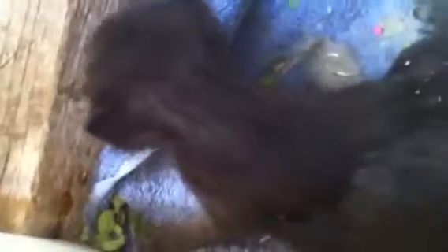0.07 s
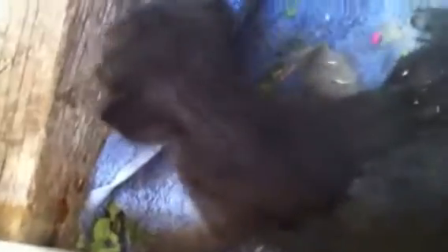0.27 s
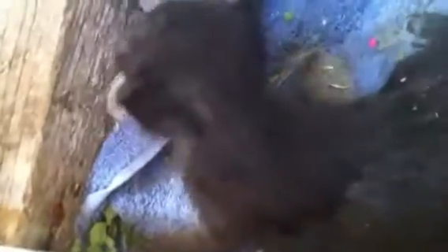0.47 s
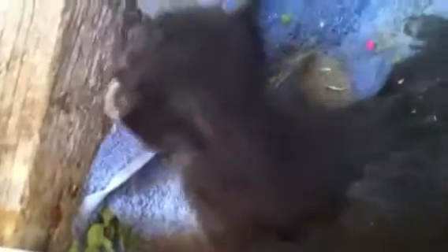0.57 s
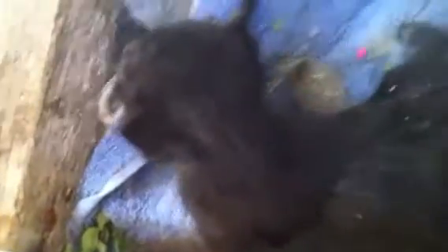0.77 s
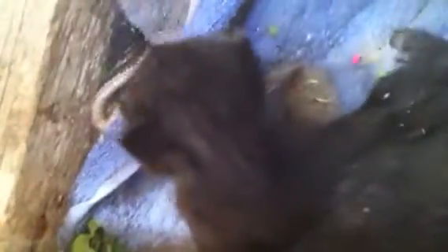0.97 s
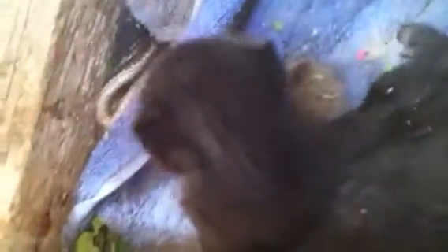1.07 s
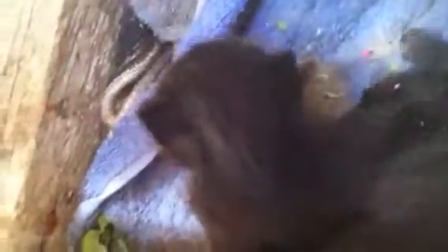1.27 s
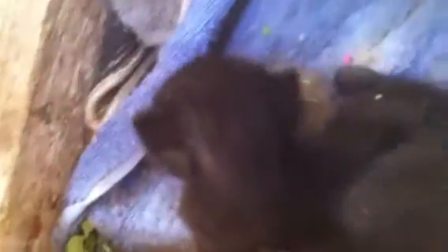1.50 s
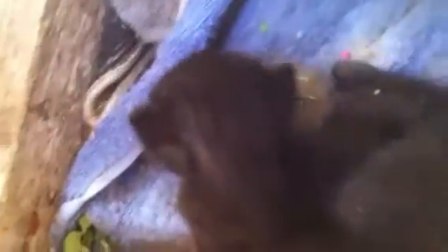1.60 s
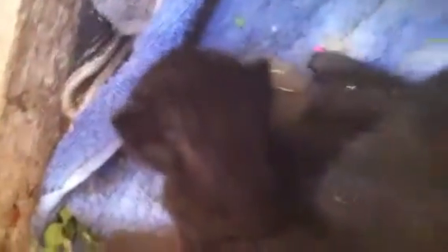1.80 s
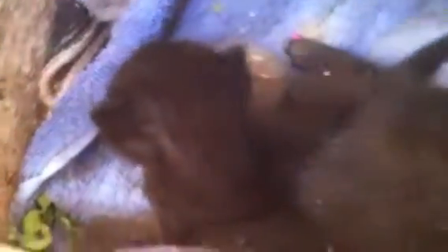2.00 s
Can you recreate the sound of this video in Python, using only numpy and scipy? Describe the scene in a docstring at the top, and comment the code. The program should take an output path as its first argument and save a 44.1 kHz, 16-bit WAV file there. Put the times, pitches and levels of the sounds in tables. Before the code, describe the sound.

Kitten mews, close: a rough thin cry rises from 0 s, breaks higher near 0.2 and sinks, fading by about 0.75. A muffled scuff and cluster of paw bumps hits at 0.35-0.4, softer bumps continuing to 0.85, with a faint distant mew near 0.55. A second, wavering mew runs 0.87-1.25, ending in a rough catch. Then quiet fur rustle, light bumps from 1.73, faint outdoor hush.

```python
"""First a kitten's rough, thin cry slides up, breaks into a higher register and sinks away in a mew.
The place is a blanket-lined wooden box, kittens and cloth close to the microphone, one kitten farther off.
A second mew wavers and ends in a rough catch; the voices are a fundamental with throat-shaped overtones.
Paws bump a floor of damped modes; claws snag and tick; cloth and fur are streams of random slips.
Behind it all lies a faint outdoor hush of coloured noise."""
import sys
import numpy as np
from scipy import signal
from scipy.fft import rfft, irfft
from scipy.io import wavfile

SR = 44100
rng = np.random.default_rng(int(sys.argv[2]) if len(sys.argv) > 2 else 0)


def bounce(signal):
    """Save signal as a 16-bit WAV file at the path given by the first command-line argument."""
    frames = np.transpose(np.atleast_2d(signal))
    limited = np.clip(frames, -1, 1)
    pcm = np.round(limited * 32767).astype(np.int16)
    wavfile.write(sys.argv[1], SR, pcm)


N = 90404
TIME = np.arange(N) / SR
CUTOFF_HZ = 15700


def from_db(db):
    """Decibels to gain."""
    return 10 ** (np.asarray(db) / 20)


def rms_one(x):
    """Scale to unit rms."""
    return x / np.sqrt(np.mean(x ** 2) + 1e-20)


def at_hz(points, hz):
    """Read a spectrum on a log-frequency axis."""
    f, db = np.transpose(points)
    return np.interp(np.log(hz + 1e-9), np.log(f), db)


def level(rows):
    """Gain from a dB curve, its end values held 30 ms longer, then silent."""
    s, db = np.transpose(rows)
    sounding = (TIME >= s[0] - .03) * (TIME <= s[-1] + .03)
    return from_db(np.interp(TIME, s, db)) * sounding


def curve(rows):
    """Read a dB curve over time."""
    return np.interp(TIME, *np.transpose(rows))


def drift(hz):
    """Smooth random motion of spread 1: noise through a double pole, its settling half dropped."""
    r = np.exp(-2 * np.pi * hz / SR)
    motion = signal.lfilter([1], [1, -2 * r, r * r], rng.standard_normal(2 * N))
    return rms_one(motion[N:])


def coloured(x, colour):
    """Give an excitation a spectrum; rms 1."""
    hz = np.arange(N + 1) * SR / (2 * N)
    spectrum = rfft(x, 2 * N) * from_db(at_hz(colour, hz))
    return rms_one(irfft(spectrum)[:N])


def grains(per_s, spread_db):
    """Random slips of uneven size and either sign."""
    size_db = spread_db * np.minimum(rng.exponential(1, N), 4)
    sizes = from_db(size_db) * rng.choice([-1, 1], N)
    return sizes * (rng.random(N) < per_s / SR)


def low_pass(x, hz):
    """Second-order low-pass."""
    return signal.sosfilt(signal.butter(2, min(hz, SR / 2 - 1), fs=SR, output="sos"), x + 1e-18)


# spectrum of the outdoor air behind the box: (f/Hz, level/dB)
HUSH_COLOUR = [(30, -33), (70, -20), (170, 1), (450, -2), (950, -4.5), (1600, -7), (4300, -29.5),
               (5500, -23.5), (9000, -29.5), (12000, -32.5), (15500, -42)]


def hush():
    """Outdoor background: steady noise with a sloping spectrum, at -58 dB rms."""
    return from_db(-58) * coloured(rng.standard_normal(N), HUSH_COLOUR)


SLIP_SPREAD_DB = 1.5

# dull shuffling on the blanket: (t/s, level/dB)
SHUFFLE = [(0, -65), (.14, -48), (.29, -55.5), (.34, -33), (.42, -34.5), (.52, -44.5), (.6, -44),
           (.84, -40.5), (.88, -54), (.98, -56.5), (1.02, -44.5), (1.09, -56), (1.26, -52), (1.34, -58.5),
           (1.69, -62), (1.73, -43.5), (2.05, -48.5)]
# its spectrum: (f/Hz, level/dB)
SHUFFLE_COLOUR = [(30, -38), (60, -19), (110, -2), (185, -0.5), (310, -8), (450, -28.5), (900, -34.5),
                  (6000, -100)]


def shuffle():
    """Dense slips of cloth on the padded floor, heard as a low rumble between the bumps."""
    return level(SHUFFLE) * coloured(grains(per_s=900, spread_db=SLIP_SPREAD_DB), SHUFFLE_COLOUR)


# one hard scuff: (t/s, level/dB)
SCUFF = [(.338, -49), (.358, -29.5), (.372, -24.5), (.385, -30), (.42, -50)]
# its spectrum: (f/Hz, level/dB)
SCUFF_COLOUR = [(40, -42), (125, -9), (200, -6.5), (360, 4.5), (520, -2.5), (780, -8.5), (1200, -18.5),
                (1600, -37), (6000, -72)]


def scuff():
    """A denser stream of slips in one short swell."""
    return level(SCUFF) * coloured(grains(per_s=1600, spread_db=SLIP_SPREAD_DB), SCUFF_COLOUR)


# fur rubbing on the blanket, before its flutter: (t/s, level/dB)
RUSTLE = [(0, -54), (.36, -60.5), (.55, -63), (.62, -60), (.75, -58.5), (.85, -61.5), (1.1, -62.5),
          (1.25, -67), (1.35, -57), (1.48, -59.5), (1.56, -53.5), (1.63, -63), (1.69, -57.5), (1.75, -52.5),
          (1.83, -56), (1.88, -62), (2.05, -58.5)]
# its spectrum: (f/Hz, level/dB)
RUSTLE_COLOUR = [(300, -19), (600, 3), (1200, -4.5), (2000, 3), (3200, 2), (4300, 2), (5200, -7),
                 (8500, -9), (12000, -22.5), (15500, -42)]


def rustle():
    """Fur against cloth: very dense slips of uneven size, with a level that flutters by about 1 dB."""
    rubbing = coloured(grains(per_s=8100, spread_db=2.5), RUSTLE_COLOUR)
    flutter_db = 1.0 * drift(19)
    return level(RUSTLE) * rubbing * from_db(flutter_db)


# a brighter swish of cloth: (t/s, level/dB)
SWISH = [(.64, -96), (.72, -59.5), (.755, -61), (.772, -52.5), (.79, -63), (.84, -90)]
# its spectrum: (f/Hz, level/dB)
SWISH_COLOUR = [(2000, -3), (5000, 2.5), (6400, 9.5), (8000, -2.5), (11500, -5.5), (15000, -27)]


def swish():
    """Cloth slips of nearly even size, bright and brief."""
    return level(SWISH) * coloured(grains(per_s=5900, spread_db=0.5), SWISH_COLOUR)


# claws catching and small wet ticks; level is the steady rms of the resonance that the burst excites,
# width is for one of its two equal stages: (t/s, level/dB, centre f/Hz, width f/Hz, decay to 1/e t/s)
TICKS = [(0.073, -47.5, 9500, 1500, 0.0023), (.469, -57.5, 3470, 5950, .004),
         (.907, -55, 5440, 1400, 0.0045), (1.256, -56.5, 5100, 9000, .014), (1.3, -46, 634, 404, .009),
         (1.952, -58.5, 7000, 6000, .0046)]


def ticks():
    """Brief bursts of noise in one broad, steep-sided resonance each."""
    out = np.zeros(N)
    for s, db, hz, width_hz, decay_s in TICKS:
        r = np.exp(-np.pi * width_hz / SR)
        resonance = [1, 0, -1, 1, -2 * r * np.cos(2 * np.pi * hz / SR), r * r]
        noise = rng.standard_normal(N)
        burst = noise * (TIME >= s) * np.exp(-np.maximum(TIME - s, 0) / decay_s)
        steady, tick = signal.sosfilt([resonance] * 2, [noise, burst + 1e-18 * noise])
        out += from_db(db) * tick / steady.std()
    return out


# claws snag in the weave and let go, jolt level before softening: (t/s, level/dB)
SNAGS = [(0.3588, -26.5), (.3632, -22.5), (0.3728, -24), (0.3768, -23), (0.3801, -23), (0.4013, -22.5),
         (1.3014, -42.5)]
# ringing of the box: (f/Hz, level/dB, 60 dB decay t/s)
SNAG_MODES = [(375, -4, 0.023), (693, -5, 0.013), (1190, -23, .005)]
SNAG_SOFTNESS_HZ = 1610


def snags():
    """A claw lets go of the weave: a brief jolt that rings in the box, softened twice."""
    jolts = np.zeros(N)
    for s, db in SNAGS:
        jolts[int(s * SR)] = -from_db(db)
    ring = np.zeros(N)
    for hz, db, t60 in SNAG_MODES:
        ring += from_db(db - 60 * TIME / t60) * np.cos(2 * np.pi * hz * TIME)
    ringing = signal.fftconvolve(jolts, ring)[:N]
    return low_pass(low_pass(ringing, SNAG_SOFTNESS_HZ), SNAG_SOFTNESS_HZ)


# paws and bodies on the padded floor, level before the filters: (t/s, level/dB, contact brightness f/Hz)
BUMPS = [(.131, -29, 396), (.32, -34, 497), (.345, -10, 705), (0.35, -13.5, 550), (0.3648, -25, 800),
         (0.3819, -15.5, 607), (0.3871, -17.5, 560), (.392, -21, 560), (.398, -15, 700),
         (0.4524, -19.5, 475), (.4725, -24, 398), (.503, -25.5, 484), (0.56, -22.5, 288), (.622, -24, 446),
         (0.629, -19, 530), (0.678, -26.5, 600), (0.7238, -23.5, 455), (.7515, -23, 394),
         (0.815, -22.5, 560), (0.8473, -22.5, 417), (1.014, -35, 520), (1.219, -35.5, 385),
         (1.7326, -21, 424), (1.755, -26.5, 394), (1.912, -32.5, 394), (1.931, -27, 398),
         (1.976, -26.5, 396), (2.041, -29.5, 600)]
# swings of the floor, pitch before detuning: (f/Hz, level/dB, 60 dB decay t/s)
FLOOR_MODES = [(114, -19, 0.12), (187.3, -1, 0.028), (311, -12, 0.013)]
BUMP_RISE_S, FLOOR_DETUNE = 0.00067, .04   # detune is a relative spread, new for each bump and mode
BUMP_LOW_CUT_HZ, PAD_SOFTNESS_HZ = 103, 880


def bumps():
    """Each soft contact sets the damped floor swinging for a few cycles."""
    out = np.zeros(N)
    for s, db, contact_hz in BUMPS:
        age = np.maximum(TIME - s, 0)
        swing = np.zeros(N)
        for hz, mode_db, t60 in FLOOR_MODES:
            mode_hz = hz * rng.normal(1, FLOOR_DETUNE)
            swing += from_db(mode_db - 60 * age / t60) * np.sin(2 * np.pi * mode_hz * age)
        contact = low_pass(swing * (1 - np.exp(-age / BUMP_RISE_S)), contact_hz)
        out += from_db(db) * low_pass(contact, PAD_SOFTNESS_HZ)
    return signal.sosfilt(signal.butter(4, BUMP_LOW_CUT_HZ, "high", fs=SR, output="sos"), out)


# jitter and shimmer are relative depths at roughness 1; the waver is always there
VOICE_EDGE_S, SHIMMER = 0.0024, 0.62
JITTER, JITTER_HZ, WAVER, WAVER_HZ = 0.0333, 363, 0.00163, 35
TREBLE_FROM_HZ, TREBLE_RAMP_HZ = 3600, 1310


def voice(rows, throat, air_db, treble_db=0):
    """Vibrating folds: a strong fundamental, overtones shaped by the throat, jitter and shimmer when rough."""
    s, *columns = np.transpose(rows)
    hz, base_db, over_db, rough = [np.interp(TIME, s, c) for c in columns]
    gate = np.clip(np.minimum(TIME - s[0], s[-1] - TIME) / VOICE_EDGE_S + .5, 0, 1)
    wobble = JITTER * rough * drift(JITTER_HZ) + WAVER * drift(WAVER_HZ)
    phase = 2 * np.pi * np.cumsum(hz * (1 + wobble)) / SR
    tone = from_db(base_db) * np.sin(phase)
    for k in range(2, 13):
        treble = np.clip((k * hz - TREBLE_FROM_HZ) / TREBLE_RAMP_HZ, 0, 1)
        overtone_db = over_db + treble * treble_db + at_hz(throat, k * hz)
        tone += from_db(overtone_db) * np.sin(k * phase) * (k * hz < CUTOFF_HZ)
    shimmer = 1 + SHIMMER * rough * drift(JITTER_HZ)
    breath = rng.standard_normal(N) * (1 + np.sin(phase))   # pulses with the folds
    air = from_db(over_db + air_db) * coloured(breath, throat)
    return gate * (np.sqrt(2) * tone * shimmer + air)   # root 2 makes sine levels rms


# a farther kitten, faint and thin:
# (t/s, pitch f/Hz, fundamental level/dB, overtone level/dB before the throat, roughness factor)
FAR_MEW = [(.5, 2420, -78, -90, 0.085), (.53, 2335, -60, -84, .05), (.595, 2360, -70, -87, .1)]
# throat and mouth response, for the far mew and the second one: (f/Hz, level/dB)
SECOND_THROAT = [(1000, -28), (2900, 1), (3300, 0.5), (4300, -18), (5200, -8), (6000, -6), (6800, -27),
                 (9000, -34), (10500, -22), (11500, -40), (13000, -45)]


def far_mew():
    """A high voice at a distance, almost a bare fundamental."""
    return voice(FAR_MEW, SECOND_THROAT, air_db=-18)


# short squeaks and the catch that ends the second mew, levels at mid-squeak: (start t/s, length t/s,
# start f/Hz, goal f/Hz, fundamental level/dB, overtone level/dB before the throat, roughness factor)
SQUEAKS = [(0.583, 0.028, 1051, 1485, -60.5, -52, 1.81), (0.795, 0.038, 1340, 785, -52.5, -66, .1),
           (1.2458, 0.0093, 1180, 1003, -43.5, -37.5, 1.38), (1.258, 0.011, 1245, 1410, -47.5, -48, 1.2)]
# response with the mouth nearly shut: (f/Hz, level/dB)
SHUT_THROAT = [(1000, -24), (1700, 0), (2150, -3), (2700, -8), (3300, -22.5), (4000, -26), (8000, -48)]


def squeaks(edge_db=8, settle=2.67):
    """Short glides that swell and fade while the pitch nears its goal, quickly at first."""
    out = np.zeros(N)
    for s, length, hz, goal, base, over, rough in SQUEAKS:
        rows = []
        for part in np.linspace(0, 1, num=5):
            fade = edge_db * (2 * part - 1) ** 2
            pitch = goal + (hz - goal) * np.exp(-settle * part)
            rows.append((s + length * part, pitch, base - fade, over - fade, rough))
        out += voice(rows, SHUT_THROAT, air_db=-16)
    return out


# second mew, close:
# (t/s, pitch f/Hz, fundamental level/dB, overtone level/dB before the throat, roughness factor)
SECOND_MEW = [(.871, 1399, -45, -54, .4), (.879, 1544, -50.5, -73, .19), (.892, 1417, -47, -64, 0.18),
              (.908, 1552, -49, -65, .05), (.95, 1524, -49, -64, .05), (.978, 1491, -41.5, -60, .03),
              (1.015, 1507, -41.5, -63.5, .017), (1.061, 1440, -43.5, -67.5, .042),
              (1.067, 1760, -47, -80, .14), (1.077, 1500, -47, -81, .54), (1.083, 1695, -45, -68, 0.046),
              (1.18, 1614, -55, -67.5, 0.028), (1.243, 1492, -51, -67, .11)]
# extra level of its treble overtones: (t/s, level/dB)
SECOND_TREBLE = [(.9, -18), (.98, 2), (1.055, 8), (1.09, -5)]


def second_mew():
    """The answering mew: a wavering pitch, with treble overtones that rise and fall."""
    return voice(SECOND_MEW, SECOND_THROAT, air_db=-6.5, treble_db=curve(SECOND_TREBLE))


# cry that leads into the first mew, close:
# (t/s, pitch f/Hz, fundamental level/dB, overtone level/dB before the throat, roughness factor)
RISING_CRY = [(.002, 1086, -61, -66, .4), (.015, 990.6, -58, -49.5, 0.22), (.028, 1060, -58.5, -48.5, .15),
              (.074, 1196, -54.5, -45, 0.15), (.1, 1348, -56, -44.5, 0.22),
              (.128, 1583, -52.5, -44.5, .078), (.152, 1702, -66, -46.5, 0.12),
              (.177, 1787, -52, -41, 0.31)]
# response with the mouth wide open: (f/Hz, level/dB)
OPEN_THROAT = [(600, -3), (2000, -7.5), (2700, -4), (3200, 3.5), (3550, -16.5), (4000, 0), (4450, -3),
               (5000, -24), (5650, -14), (6200, -17.5), (6900, -12), (8000, -27), (10000, -27),
               (12300, -27), (13500, -43)]


def rising_cry():
    """A rough voice slides up, with overtones passed by the wide-open mouth."""
    return voice(RISING_CRY, OPEN_THROAT, air_db=-22)


# first mew, close:
# (t/s, pitch f/Hz, fundamental level/dB, overtone level/dB before the throat, roughness factor)
FIRST_MEW = [(.18, 1945, -42, -46, 0.34), (.184, 1982, -44, -39, 0), (.24, 1990, -43, -40, 0),
             (.33, 1926, -42.5, -45.5, 0.02), (.402, 1856, -43.5, -50.5, 0.1),
             (.412, 1841, -44, -46.5, 0.23), (.48, 1771, -46, -58, 0.01), (.57, 1720, -53.5, -71, 0.02),
             (.7, 1632, -62.5, -72, 0.05), (.77, 1553, -70, -73, 0)]
# throat and mouth response: (f/Hz, level/dB)
FIRST_THROAT = [(1200, -17), (3000, 14), (3520, -16), (3730, -7), (4000, -0.5), (5400, -55), (6000, -26),
                (6900, -34), (7500, -6.5), (8000, -25.5), (8600, -18), (9700, -33.5), (10400, -30),
                (11200, -37), (12000, -32), (14000, -52)]
# extra level of its treble overtones: (t/s, level/dB)
FIRST_TREBLE = [(.46, -1), (.58, 17.5), (.68, 9)]


def first_mew():
    """The cry broken into a higher register: the pitch then sinks as the voice fades."""
    return voice(FIRST_MEW, FIRST_THROAT, air_db=-15.5, treble_db=curve(FIRST_TREBLE))


def scene():
    """Kittens and blanket close to the microphone, over the outdoor hush."""
    blanket = shuffle() + scuff() + rustle() + swish()
    paws = ticks() + snags() + bumps()
    kittens = far_mew() + squeaks() + second_mew() + rising_cry() + first_mew()
    return (hush() + blanket + paws + kittens)[None]


def record(dry):
    """The single microphone channel, its top cut steeply by an elliptic low-pass."""
    return signal.sosfilt(signal.ellip(10, .2, 80, CUTOFF_HZ, fs=SR, output="sos"), dry)


dry = scene()
out = record(dry)
bounce(out)
```